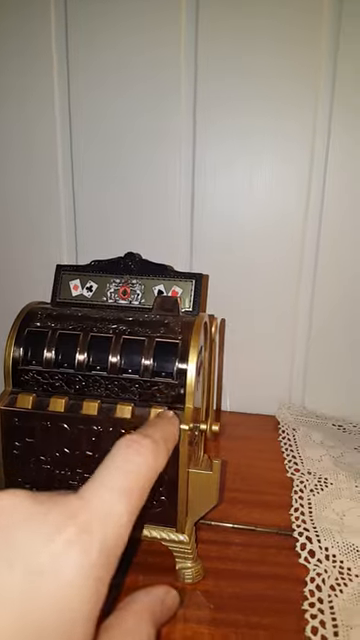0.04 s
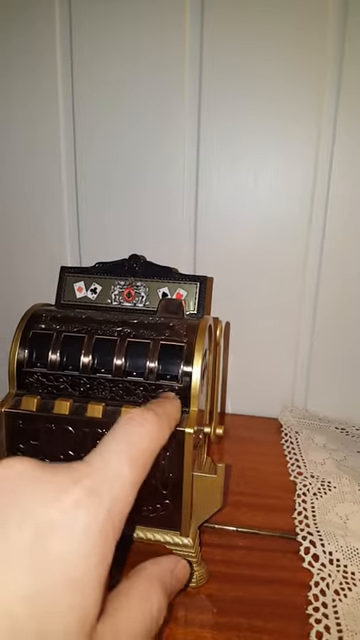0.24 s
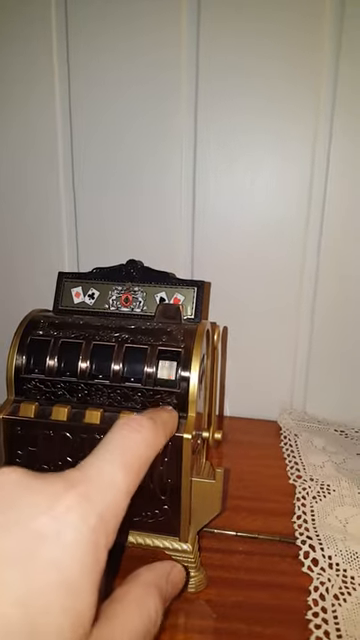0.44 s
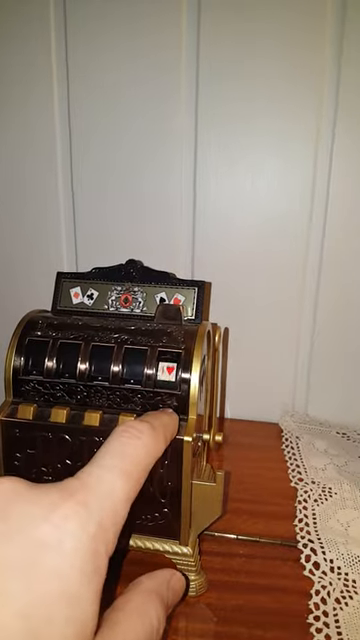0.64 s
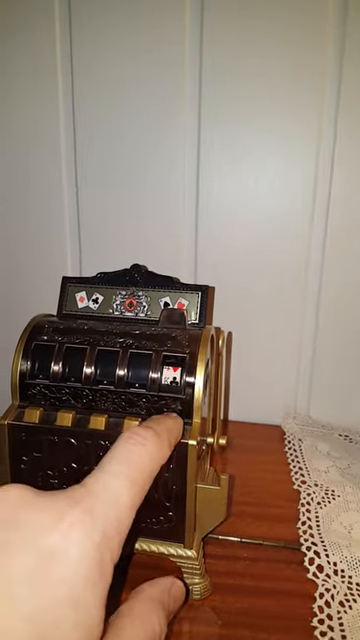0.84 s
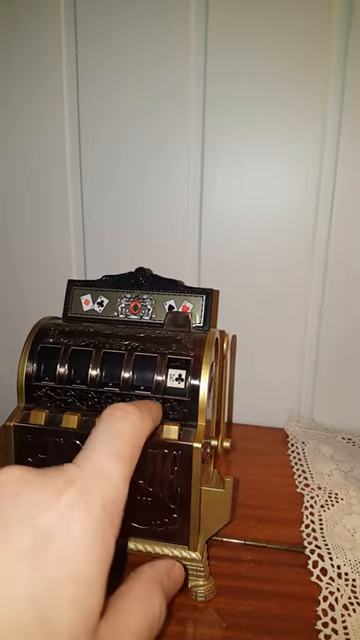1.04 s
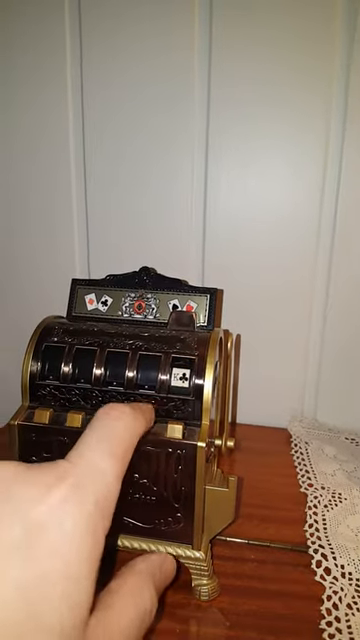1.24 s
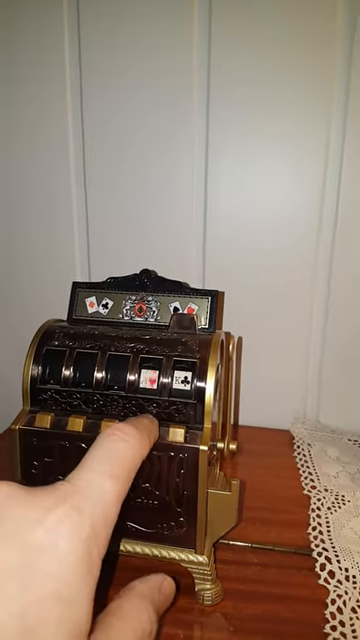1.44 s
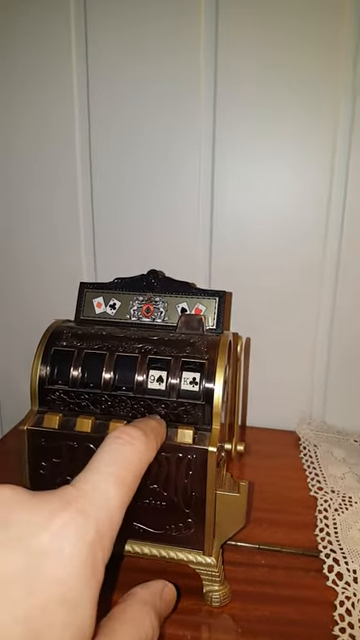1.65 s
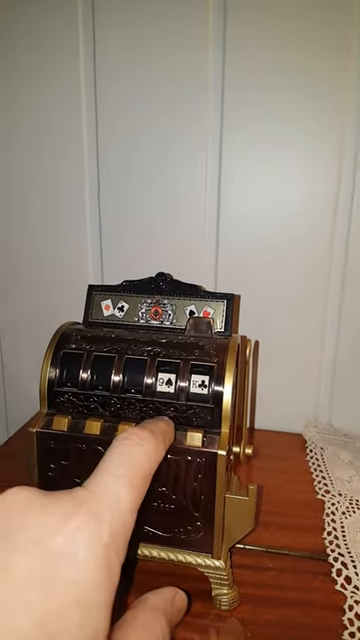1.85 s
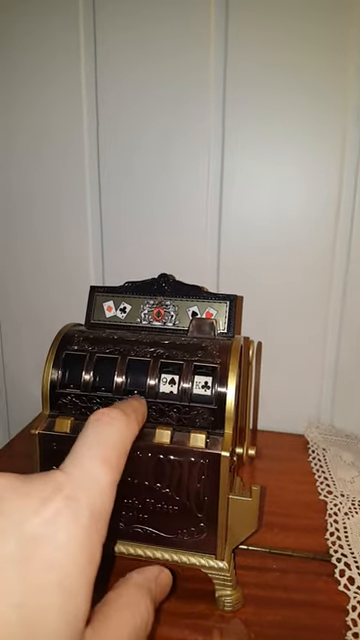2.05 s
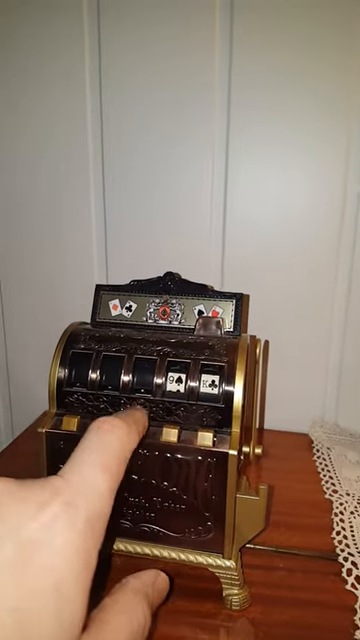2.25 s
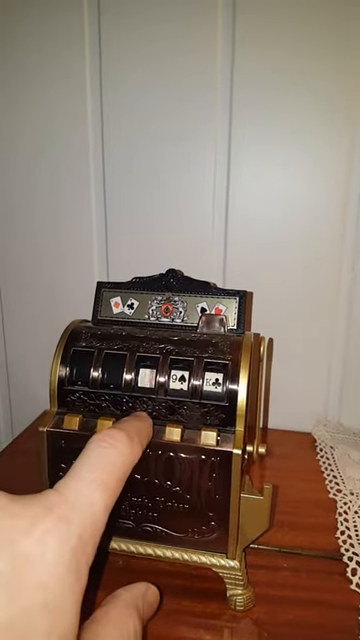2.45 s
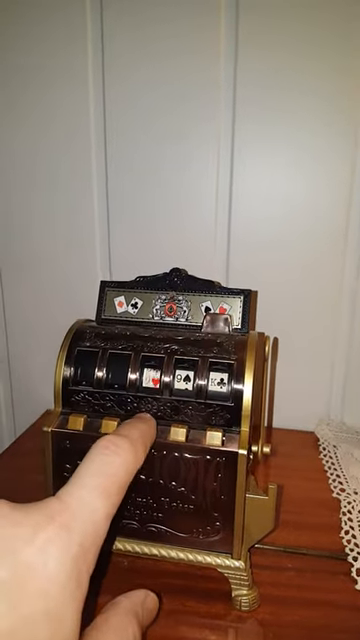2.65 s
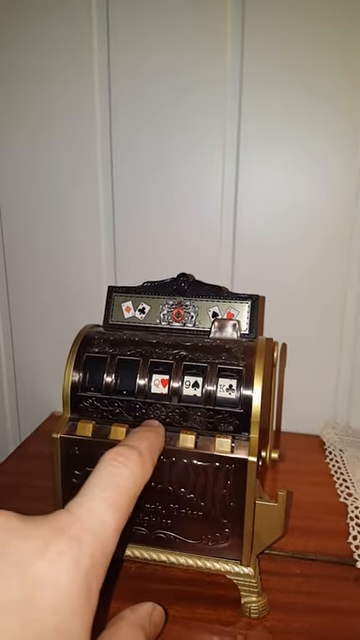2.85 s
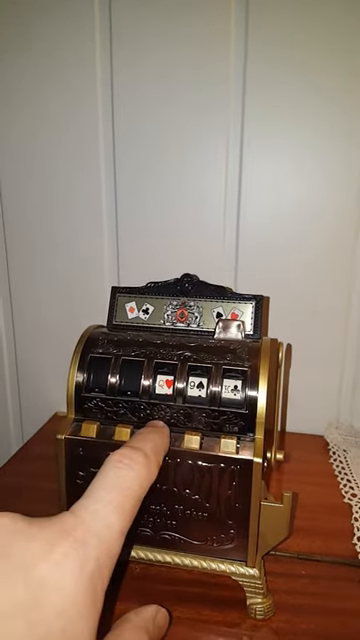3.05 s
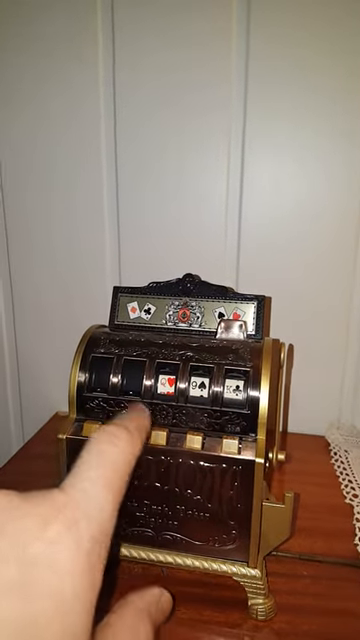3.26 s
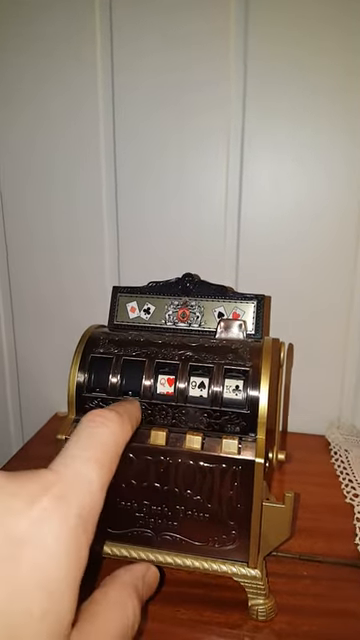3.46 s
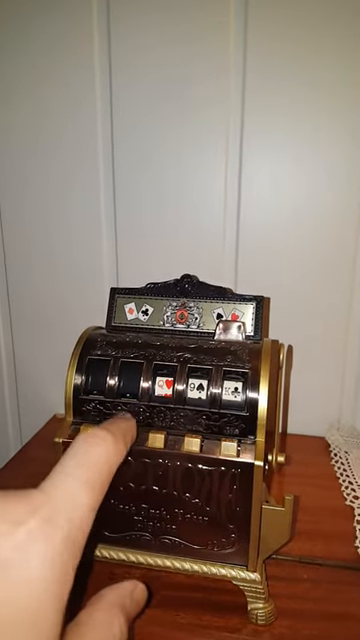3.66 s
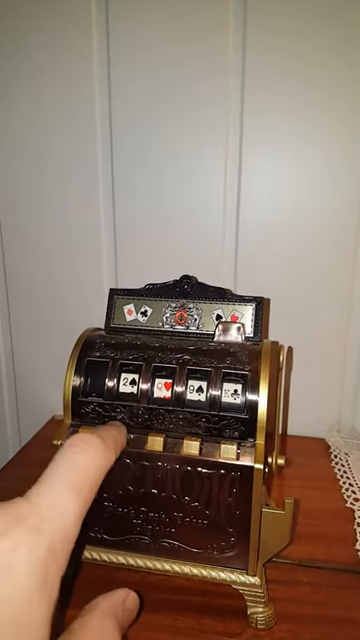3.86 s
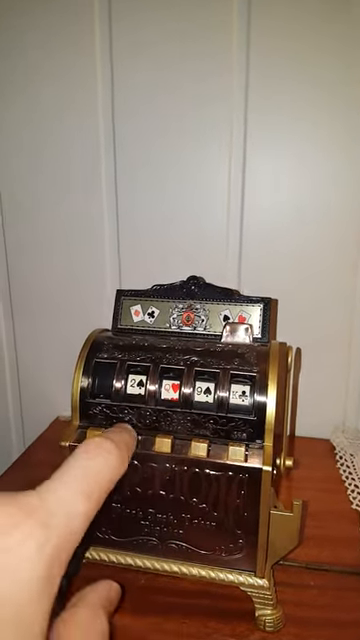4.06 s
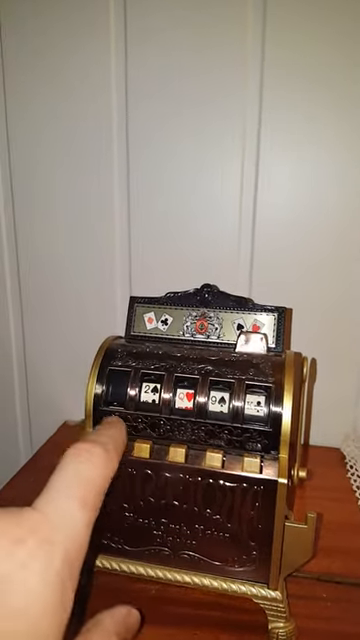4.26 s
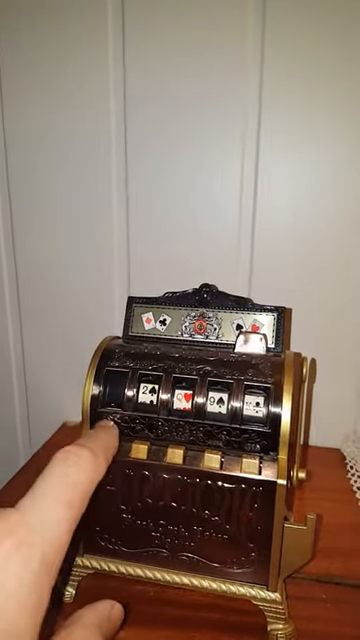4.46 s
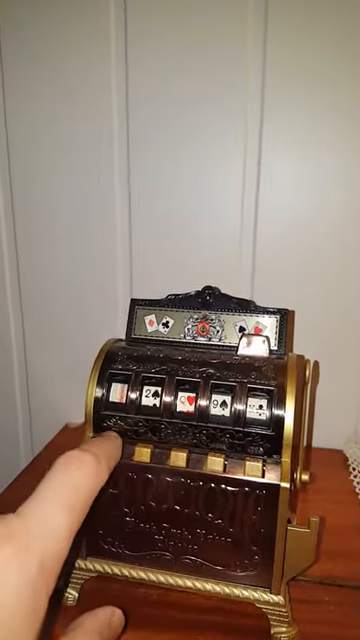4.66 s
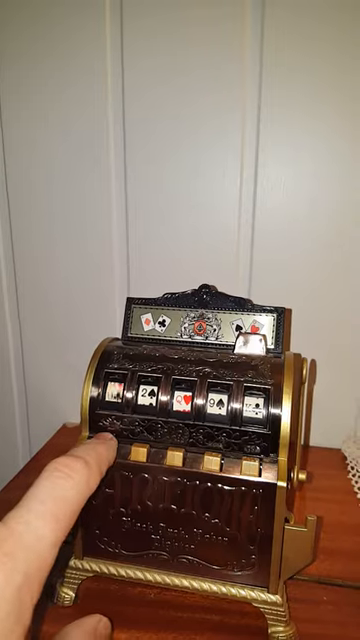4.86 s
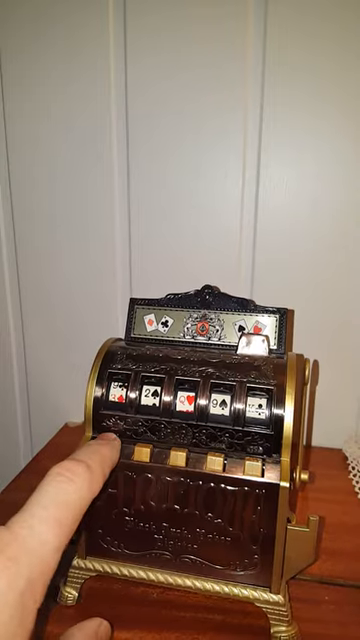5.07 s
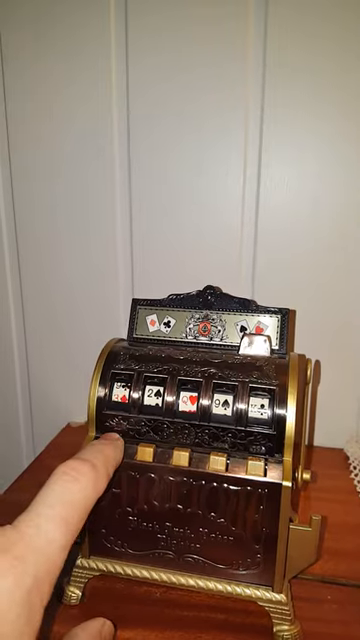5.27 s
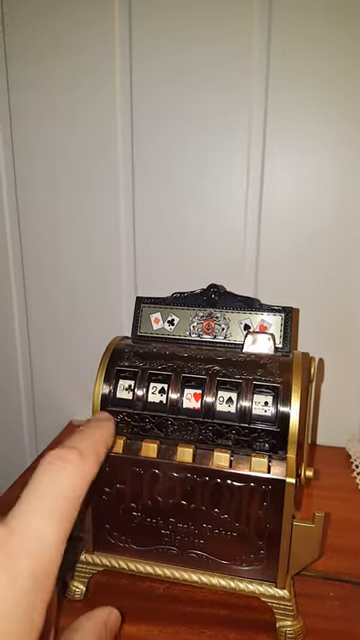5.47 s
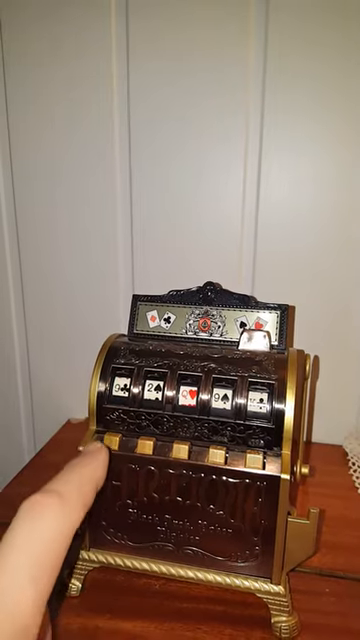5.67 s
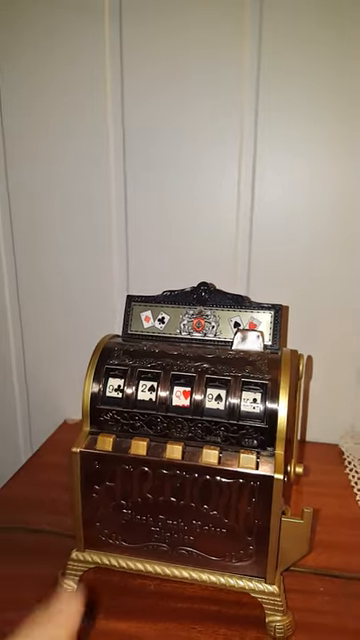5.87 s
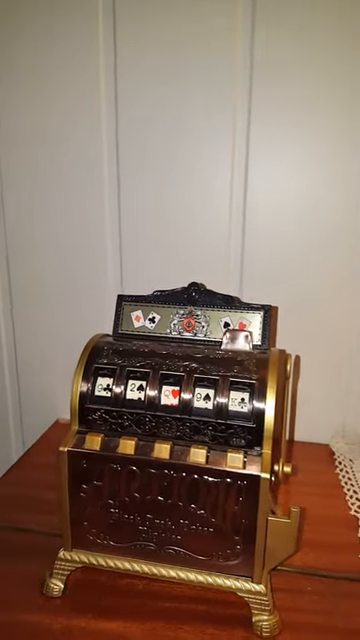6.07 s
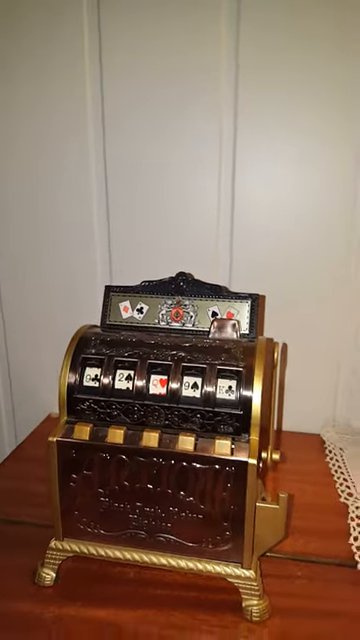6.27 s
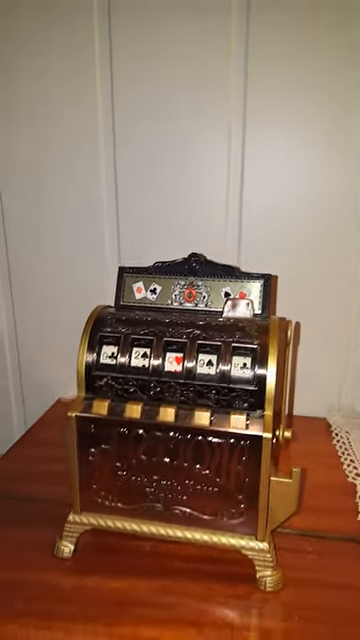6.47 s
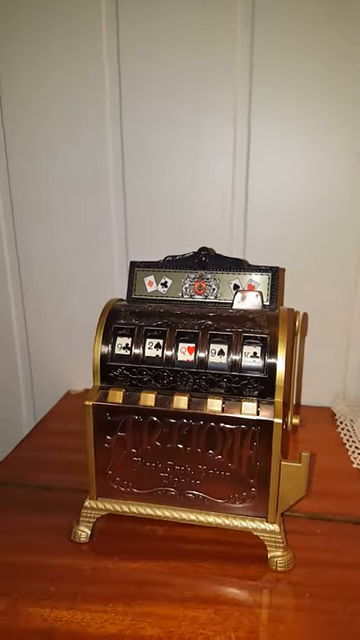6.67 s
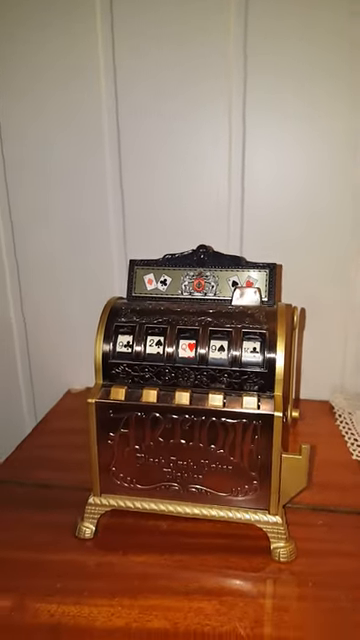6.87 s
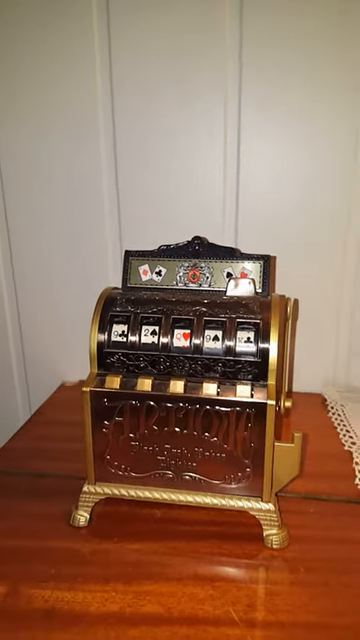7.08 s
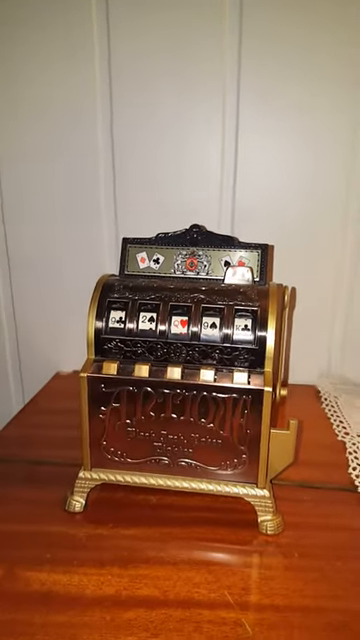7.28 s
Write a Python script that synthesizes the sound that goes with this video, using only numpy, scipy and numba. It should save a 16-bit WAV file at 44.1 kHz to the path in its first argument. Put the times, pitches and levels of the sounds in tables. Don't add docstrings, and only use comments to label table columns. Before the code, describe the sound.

Very close stereo phone pickup in a small quiet room: five abrupt, loud metal snaps spaced about a second apart, the first three bright and gritty, the fourth duller and boxier with a bounce, the fifth also doubled. Between them come light fingertip taps, brief scrapes and buzzing loose parts. Afterwards soft taps, one dull knock, a tiny tick and faint room hum.

```python
import sys
import numpy as np
from scipy import signal
from scipy.fft import rfft, irfft
from scipy.io import wavfile
from scipy.ndimage import uniform_filter1d
from numba import njit

SR = 44100
rng = np.random.default_rng(int(sys.argv[2]) if len(sys.argv) > 2 else 0)


def magnitude_from_level(level_db):
    exponent = np.asarray(level_db, float) / 20
    return 10 ** exponent


def store_wav(level_fs):
    pcm = np.round(np.clip(np.atleast_2d(level_fs), -1, 1) * 32767)
    wavfile.write(sys.argv[1], SR, pcm.T.astype(np.int16))


N = 322949


def along(table, hz):
    table = np.array(table)
    return np.interp(np.log(hz + 1), np.log(table[:, 0]), table[:, 1])


def colour(x, gain):
    size = x.shape[-1]
    return irfft(rfft(x) * gain(np.arange(size // 2 + 1) * SR / size), size)


def band(x, hz, octaves):
    y = colour(x, lambda f: np.exp(-(np.log2((f + 1) / hz) / octaves) ** 2))
    return y / np.sqrt(np.mean(y ** 2))


def unit(x):
    return x / np.max(np.abs(x))


def wander(shape, step):
    return uniform_filter1d(np.repeat(rng.standard_normal(shape), step, axis=-1), size=step)


def lean(db):
    return magnitude_from_level([[-db], [db]])


def add(out, x, s):
    i = int(s * SR)
    out[:, i:i + x.shape[1]] += x[:, :N - i]


# (f/Hz, likeness 0-1)
LIKENESS = [(60, 1), (300, 0.7), (640, 0.5), (1400, 0.2), (15000, .0)]


def pair(size):
    mid, side = rng.standard_normal((2, size))
    mid = colour(mid, lambda hz: np.sqrt((1 + np.clip(along(LIKENESS, hz), 0, 1)) / 2))
    side = colour(side, lambda hz: np.sqrt((1 - np.clip(along(LIKENESS, hz), 0, 1)) / 2))
    return np.array([mid + side, mid - side])


def ring(modes, tilt_db=0):
    hz, db, t60 = (c[:, None] for c in np.transpose(modes))
    t = np.arange(SR // 4) / SR
    strength, detune = rng.standard_normal((2, len(modes), 1))
    gain = magnitude_from_level(db + 2.5 * strength + tilt_db * np.log2(hz / 3000))
    tones = np.sin(2 * np.pi * hz * (1 + .007 * detune) * t)
    return np.sum(gain * tones * 1000. ** (-t / t60), axis=0)


# (f/Hz, level/dB, time to fall 60 dB/s)
CASE_TONES = [(368.6, -6.5, 0.023), (423, -4.5, 0.11), (474, -2, 0.099), (580, 6.5, 0.08), (645, 3, 0.056),
              (756, 6, 0.004), (826, 4.5, 0.091), (820, -5, 0.09), (1080, -9, 0.05)]
# (f/Hz, level/dB, time to fall 60 dB/s)
METAL_TONES = [(1450, -6, .02), (1570, -3, .03), (1890, 0, .04), (1980, -3, .03), (2800, -5, .015),
               (3190, -4, .02), (4150, -6, .025), (4600, -8, .012), (5860, -6, .015), (6200, -5, .015),
               (7900, -7, .012), (9300, -8, .008), (11700, -9, .008)]
# (f/Hz, level/dB per Hz)
RATTLE_COLOUR = [(530, -32.5), (900, -21.5), (1960, -13.5), (2500, -11.5), (2830, -7.5), (4270, -14),
                 (7760, -12.5), (15200, -20), (16500, -34.5)]


def contact(push, case_db, tilt_db, metal_db):
    push = np.pad(push, (0, 4096 - len(push) % 4096))
    bursts = rng.standard_normal((3, len(push))) * magnitude_from_level(5.3 * rng.standard_normal((3, len(push))))
    shared, own = bursts[0], bursts[1:]
    grit = (own * 1.3 + shared) * push

    def rattle_gain(hz):
        hardness_db = tilt_db * np.log2(hz / 3000 + 0.033)
        return magnitude_from_level(along(RATTLE_COLOUR, hz) + hardness_db) * (hz > 600)

    rattle = colour(grit, rattle_gain)
    metal = signal.fftconvolve(grit, ring(METAL_TONES, tilt_db)[None], axes=1)
    bright = magnitude_from_level(metal_db) * unit(metal)
    bright[:, :len(push)] += unit(rattle)
    boom = signal.fftconvolve(shared * push ** 2.8, ring(CASE_TONES))
    return bright + magnitude_from_level(case_db + 5.5) * unit(boom)[None]


def boom_db(db, tilt_db):
    return -18 - 0.11 * db - 0.4 * tilt_db


# (f/Hz, width/octaves, level/dB, time to fall 60 dB/s)
DYING_AWAY = [(364, 0.1, -6.5, 0.34), (475, 0.097, -1, 0.32), (606, 0.058, -3.5, 0.3), (745, .06, -5.5, .4),
              (610, 0.78, -1, 0.54), (1020, 0.48, -5, 0.32), (1536, 0.16, -6, 0.39),
              (1960, 0.25, 0.1, 0.33), (3113, 0.56, 1, 0.37), (4170, 0.34, -3.5, 0.27),
              (6450, 0.38, -3.5, 0.31), (9100, 0.24, -4, 0.34), (12100, 0.23, -5, 0.21),
              (15000, .3, -5, .25)]


def after_bands():
    ripple_db = 4.5 * wander(SR // 60 + 1, 60)
    noises = []
    for hz, octaves, *_ in DYING_AWAY:
        rippled = colour(pair(2 * SR), lambda f: magnitude_from_level(ripple_db[:len(f)]))
        noises.append(band(rippled, hz, octaves))
    return np.array(noises)


def after_rattle(bands, case_db, tilt_db):
    hz, _, db, t60 = (c[:, None, None] for c in np.transpose(DYING_AWAY))
    t = np.arange(SR // 2) / SR
    start = rng.integers(SR)
    db = db + np.where(hz < 1000, 0.89 * case_db + 14.0, 0.71 * tilt_db * np.log2(hz / 3000))
    gain = magnitude_from_level(db + 1.2 * rng.standard_normal(hz.shape)) * 1000. ** (-t / t60)
    grain = magnitude_from_level(1.6 * wander(len(t) // 128 + 1, 128)[:len(t)])
    swell = np.clip((t - .008) / 0.01, 0, 1) * np.hanning(SR)[SR // 2:] ** 0.1
    return np.sum(gain * bands[:, :, start:start + len(t)], axis=0) * grain * swell / 3


def strike(out, bands, s, db, tilt_db, ms, after_db, extra_case_db=0):
    t = np.arange(4000) / SR
    case_db = boom_db(db, tilt_db) + extra_case_db
    push = np.minimum(t / 0.00036, 1) * np.exp(-(900 * t / max(ms, .5)) ** 1.3)
    add(out, magnitude_from_level(db) * contact(push, case_db, tilt_db, metal_db=-11), s)
    add(out, magnitude_from_level(db + after_db) * after_rattle(bands, case_db, tilt_db), s)


# (t/s, level/dB, hardness/dB per octave, rattle time/ms, after-rattle level/dB)
SHUTTER_BLOWS = [
    (0.4648, 0, 3, 4.5, -22),
    (1.3932, 0.5, 3.7, 6, -20),
    (2.4236, 0, 4, 9.1, -20),
    (3.7249, 3, -1, 3, -22),
    (3.7354, -1.5, -1.5, 6, -25.5),
    (3.8104, -20, 0.5, 13, -31),
    (4.6897, 3, 0.6, 5, -24),
    (4.698, -3, 1.5, 5, -22.5),
]


def slams(out, bands):
    for row in SHUTTER_BLOWS:
        strike(out, bands, *row)


# (t/s, level/dB, rattle time/ms)
LATCH_CLICKS = [
    (.451, -23, 4.2),
    (1.354, -32, 7.2),
    (1.379, -24, 7.5),
    (2.394, -33, 9),
    (2.411, -19.5, 5),
    (3.695, -41, 6.8),
    (3.712, -27, 4.9),
    (4.666, -35, 6.8),
    (4.677, -23, 8.3),
]


def latches(out, bands):
    for s, db, ms in LATCH_CLICKS:
        strike(out, bands, s, db, -2.87, ms, after_db=-32)


# (t/s, level/dB, hardness/dB per octave, rattle time/ms)
FINGER_TAPS = [(0.9974, -34, -2.5, 7.1), (1.0374, -28.5, -10.5, 10), (1.04, -39, 0, 4.4),
               (1.0578, -30, -4.5, 2.5), (1.139, -47.5, -5, 3.2), (1.9433, -38, 2.5, 1.7),
               (1.9515, -32, -5.5, 11), (1.9668, -32, -7, 8.2), (1.9777, -43, -10.5, 5.4),
               (2.0327, -54, -8.5, 10.4), (2.6757, -41, -4, 10), (3.2324, -41, -5.5, 15),
               (3.255, -29.5, -3.5, 9.1), (3.2732, -30.5, -6, 11.5), (3.8524, -37, 9, 4.3),
               (4.0018, -52, -1.5, 2.6), (4.2435, -33.5, -5.5, 18), (4.256, -40.5, 0.4, 3.9),
               (5.3975, -46.5, -18, 1.7), (5.4276, -51, -7, 4), (5.4529, -24.5, 2.5, 7),
               (5.48, -29.5, -3.5, 11.3), (5.5124, -38.5, -4.5, 7.4), (5.552, -48, -8, 8),
               (6.244, -66.5, 8, 5)]


def taps(out, bands):
    for row in FINGER_TAPS:
        strike(out, bands, *row, after_db=-19, extra_case_db=2)


# (t/s, level/dB, hardness/dB per octave, rattle time/ms)
HAND_KNOCKS = [
    (5.9201, -27, -8, 5.5),
    (6.2856, -43, 4.5, 2.2),
]


def knocks(out, bands):
    for row in HAND_KNOCKS:
        strike(out, bands, *row, after_db=-26, extra_case_db=-3.5)


# (t/s, length/s, level/dB, hardness/dB per octave)
FINGER_RUBS = [(0.499, 0.19, -37, -0.5), (1.02, 0.062, -49, -7.5), (1.074, 0.18, -62.5, -25),
               (1.499, 0.15, -49, -3.5), (1.926, 0.051, -46.5, -2.5), (2.169, 0.048, -63, -5.5),
               (2.487, .2, -38, -4.5), (2.599, 0.13, -45.5, -6.5), (2.887, 0.043, -79, -14),
               (3.26, 0.029, -61, 7.5), (3.562, .07, -67, -7), (4.234, 0.023, -49.5, -8.5),
               (5.49, .05, -52, -10), (5.87, 0.054, -63, 4.5), (5.925, .05, -70, -2),
               (6.292, 0.02, -66, 12)]


def rubs(out):
    for s, length, db, tilt_db in FINGER_RUBS:
        drag = np.linspace(0, 1, int(1.2 * length * SR))
        push = np.minimum(5 * drag, 1) * np.cos(np.pi / 2 * drag) ** 2.6
        rub = contact(push, boom_db(db, tilt_db) + 0.5, tilt_db, metal_db=-6)
        add(out, magnitude_from_level(db + 9) * rub, s)


def machine():
    out, bands = np.zeros((2, N)), after_bands()
    slams(out, bands)
    latches(out, bands)
    taps(out, bands)
    knocks(out, bands)
    rubs(out)
    low_cut = signal.butter(6, 330, "high", fs=SR, output="sos")
    return signal.sosfilt(low_cut, out * lean(1.2))


# (t/s, length/s, level/dB, f/Hz)
PART_BUZZES = [(.485, 0.093, -37, 490), (1.0, 0.02, -41, 502), (1.037, 0.022, -40, 470),
               (1.058, 0.039, -42, 488), (1.399, .06, -36, 370), (1.504, 0.13, -48.5, 930),
               (1.414, 0.22, -51, 230), (2.429, .1, -51, 230), (1.459, 0.13, -44.5, 450),
               (1.602, 0.14, -60.5, 780), (1.95, 0.14, -54, 532), (2.46, .18, -34, 472),
               (2.66, .07, -51, 469), (2.76, .09, -58, 450), (2.666, .04, -56, 1980),
               (2.66, 0.059, -64, 4030), (3.255, 0.076, -47.5, 419), (3.369, .05, -74, 4130),
               (3.55, .05, -72, 4130), (3.75, 0.069, -33.5, 440), (3.726, .04, -24, 760),
               (4.69, .05, -23, 770), (4.714, 0.22, -48, 400), (0, .4, -72, 2250), (5.455, 0.086, -52, 550),
               (6.252, 0.48, -61.5, 410.4), (6.327, 0.37, -75.5, 3210)]


def buzzes():
    out, width_hz = np.zeros((2, N)), 37
    for s, length, db, hz in PART_BUZZES:
        u = np.linspace(0, 1, int(1.4 * length * SR))
        note = band(pair(SR // 2 * 2), hz, 1.7 * width_hz / hz)[:, :len(u)]
        add(out, magnitude_from_level(db) * note * np.minimum(6 * u, 1) * np.cos(np.pi / 2 * u) ** 2.7, s)
    return out * lean(1.5)


# (t/s, thud level/dB, thud f/Hz, spring level/dB)
TABLE_THUDS = [
    (.466, -39.5, 140, -74),
    (1.396, -39.5, 98.6, -60),
    (2.426, -41, 112, -71),
    (3.728, -46.5, 121.2, -70.5),
    (4.692, -42, 120.5, -60.5),
    (5.922, -51.5, 157, -91),
]


def table():
    out, t = np.zeros((2, N)), np.arange(SR) / SR
    for s, thud_db, hz, spring_db in TABLE_THUDS:
        wood = colour(rng.standard_normal((2, SR)), lambda f: np.exp(-np.log2((f + 1) / hz) ** 2 / .5))
        thud = unit(wood) * lean(1.5) * np.minimum(t / 0.0033, 1) * 1000. ** (-t / .3)
        beat = 1 + 0.48 * np.cos(2 * np.pi * 9 * t + 6 * rng.random())
        fade = 1000. ** (-t / 2.5) * np.hanning(2 * SR)[SR:] ** .3
        spring = beat * np.sin(2 * np.pi * 787 * t) * fade
        add(out, magnitude_from_level(thud_db + 13) * thud + magnitude_from_level(spring_db) * spring, s)
    return out


# (f/Hz, level/dB)
APPLIANCE_TONES = [(787, -85), (1235, -87)]


def appliance(flicker):
    t = np.arange(N) / SR
    return sum(magnitude_from_level(db + 4 + 1.4 * flicker) * np.sin(2 * np.pi * hz * t) for hz, db in APPLIANCE_TONES)


# (f/Hz, level/dB per Hz)
HUM_COLOUR = [(25, -20), (40, -9), (62, 4), (80, -4.5), (125, 1), (200, -4), (310, -4.5), (400, 0),
              (520, -7), (1000, -13.5), (2200, -16.5), (4000, -24.5), (8000, -32), (15500, -31)]
# (t/s, level/dB)
HUM_SWELL = [(0, 8.5), (.3, 6), (0.902, 5), (1.3, 8.5), (1.8, 5), (2.3, 6), (2.9, 2.5), (3.4, 4.5),
             (3.7, 6), (4.099, -3.2), (4.501, 0.5), (5.1, -2), (5.4, -0.7), (5.7, 4.5), (6.1, 4),
             (6.5, 8), (6.9, 4.5), (7.32, 3)]


def hum():
    s, middle_db = np.transpose(HUM_SWELL)
    bass_db = 1.08 + 0.6 * middle_db
    t = np.arange(N) / SR
    noise = colour(pair(N + N % 2), lambda hz: magnitude_from_level(along(HUM_COLOUR, hz)))
    noise *= magnitude_from_level(-67 + 1.5) / np.sqrt(np.mean(noise ** 2))
    bass = colour(noise, lambda hz: 1 / (1 + (hz / 600) ** 4))[:, :N]
    hiss = colour(noise, lambda hz: 1 - 1 / (1 + (hz / 5500) ** 4))[:, :N]
    middle = noise[:, :N] - bass - hiss
    flicker = wander((2, N // 4096 + 1), 4096)[:, :N]
    out = bass * magnitude_from_level(np.interp(t, s, bass_db) + 1.5 * flicker[0]) + hiss
    out += middle * magnitude_from_level(np.interp(t, s, middle_db) + 0.49 * flicker[1])
    out += appliance(flicker[1])
    out += magnitude_from_level(-93) * band(noise, 14600, .14)[:, :N]
    return out * lean(1.4)


def scene():
    return machine() + buzzes() + table() + hum()


@njit
def follow(size, release):
    out, e = np.empty(len(size)), 0.
    for i in range(len(size)):
        e = max(size[i], e * release)
        out[i] = e
    return out


def top_cut(x):
    return signal.sosfilt(signal.butter(12, 17060, fs=SR, output="sos"), x)


def record(dry):
    peak = follow(np.abs(dry).max(axis=0), np.exp(-1 / (.012 * SR)))
    gain = uniform_filter1d(np.minimum(1, magnitude_from_level(2) / (peak + 1e-9)) ** .6, size=160, origin=79)
    held = .9 * np.tanh(dry * gain / .9) - .0004
    top = signal.ellip(8, .2, 70, 16000, fs=SR, output="sos")
    return top_cut(signal.sosfilt(top, held))


dry = scene()
out = record(dry)
store_wav(out)
```